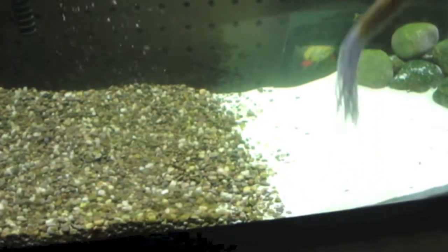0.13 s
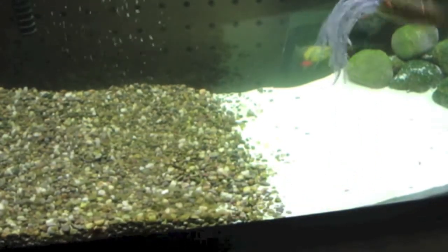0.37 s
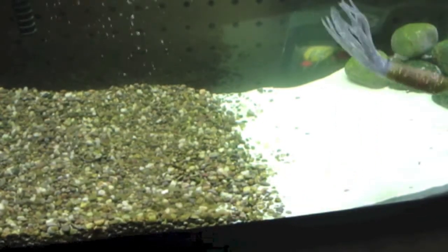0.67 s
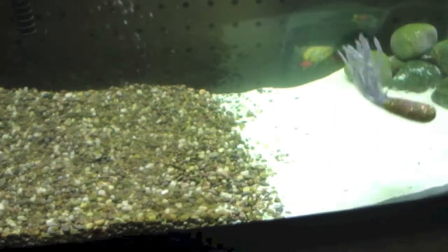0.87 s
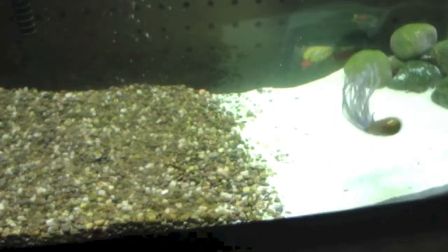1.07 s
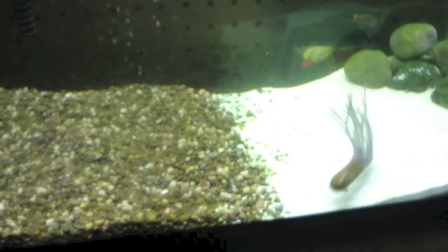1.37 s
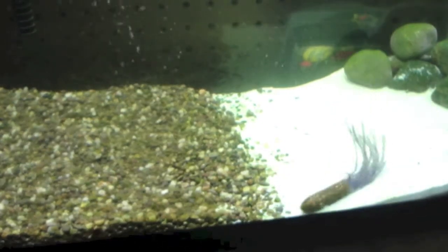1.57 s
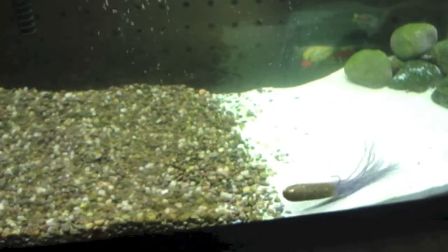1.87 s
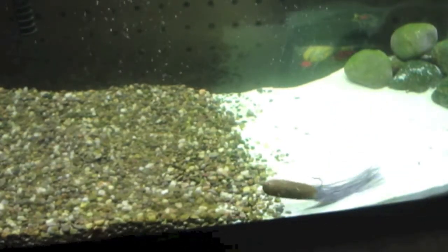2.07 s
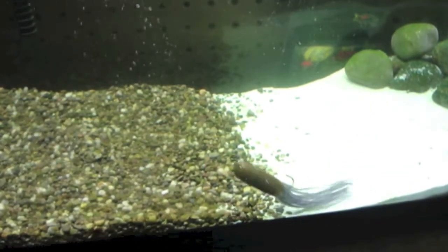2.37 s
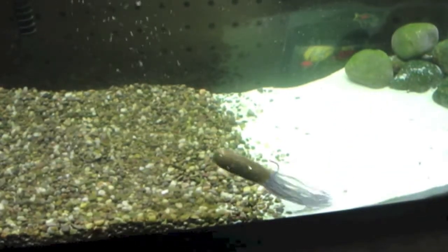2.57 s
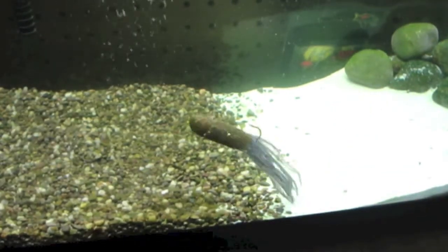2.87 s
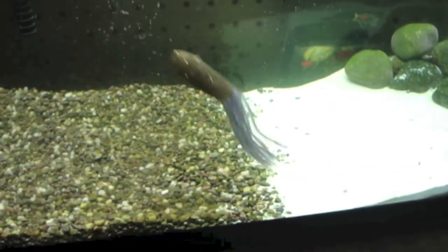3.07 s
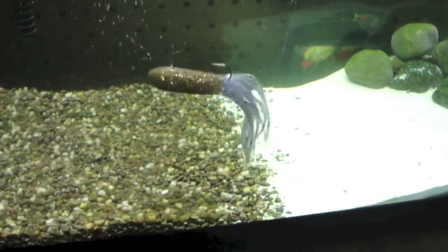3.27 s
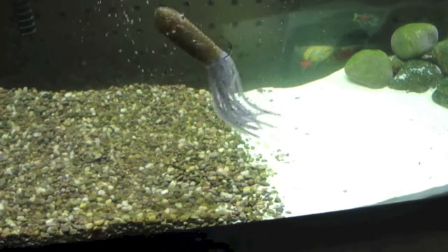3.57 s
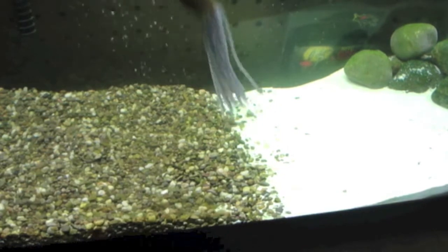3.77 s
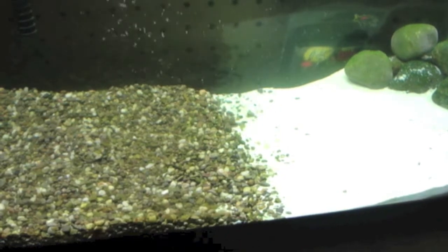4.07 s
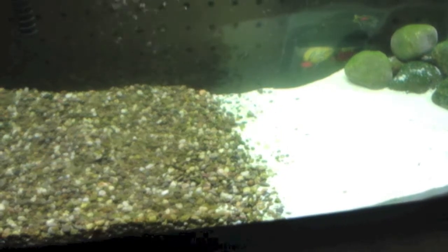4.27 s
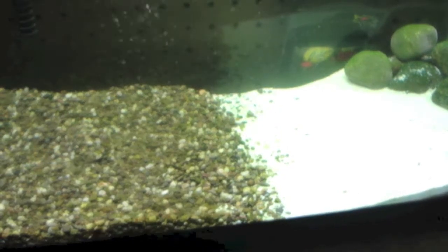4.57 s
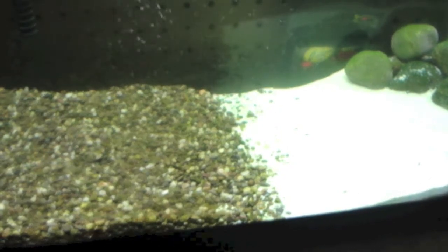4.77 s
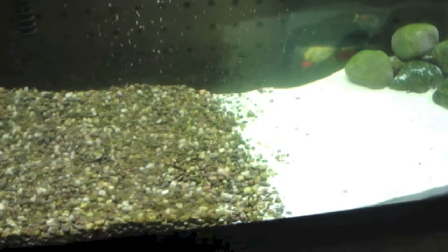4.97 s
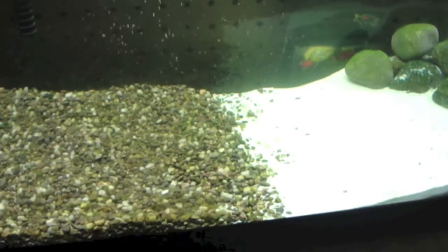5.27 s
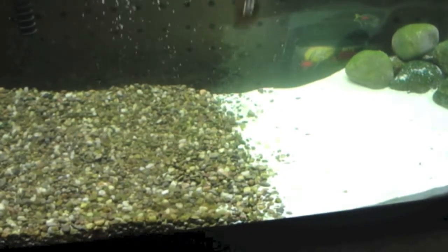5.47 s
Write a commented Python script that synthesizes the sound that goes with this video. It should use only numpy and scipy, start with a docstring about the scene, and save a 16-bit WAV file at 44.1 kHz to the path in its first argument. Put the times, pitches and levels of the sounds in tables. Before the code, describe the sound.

Bubbles pop in a quick, irregular patter of bright drips over soft hiss and faint pump hum, with a sharp tap near the end.

```python
"""Bubbles popping in a covered aquarium

Air bubbles pop at the surface, close by: each is a brief decaying sine smeared by random echoes
between water, glass and lid, with filtered noise for slosh and film snap. Spray ticks as band-passed
noise puffs, a soft lure knocks the tank into ringing modes, and a mains pump hums as wavering
harmonics in shaped room noise."""
import sys
import numpy as np
from scipy import signal
from scipy.fft import rfft, irfft
from scipy.io import wavfile
from scipy.ndimage import uniform_filter1d

SR = 44100
rng = np.random.default_rng(int(sys.argv[2]) if len(sys.argv) > 2 else 0)


def wrap_up_sound(samples):
    """Save the sound to the file named by the first command line argument, as 16-bit audio."""
    columns = np.atleast_2d(samples).T
    # keep every value between -1 and 1, then stretch to whole-number steps
    tamed = np.clip(columns, -1, 1)
    steps = np.round(tamed * 32767).astype(np.int16)
    wavfile.write(sys.argv[1], SR, steps)


N = 248724  # samples
GRAIN = 2048  # samples in one bubble or puff


def undb(db):
    """Decibels to amplitude factor."""
    return 10 ** (np.asarray(db) / 20)


def add(out, start_s, grain):
    """Mix a grain in at start_s, cut at the end of out."""
    i = int(start_s * SR)
    out[i:i + len(grain)] += grain[:max(len(out) - i, 0)]


def band(x, lo_hz, hi_hz):
    """Butterworth band-pass."""
    sos = signal.butter(2, [lo_hz, hi_hz], "bandpass", fs=SR, output="sos")
    return signal.sosfilt(sos, x)


def walk(rate_hz):
    """Slow random wander, standard deviation 1: random steps smoothed twice."""
    step = int(SR / rate_hz)
    steps = np.repeat(rng.standard_normal(N // step + 1), step)
    wander = uniform_filter1d(uniform_filter1d(steps, step), step)[:N]
    return wander / wander.std()


def unit_noise(spectrum):
    """Back to time from a shaped noise spectrum, RMS scaled to 1."""
    noise = irfft(spectrum)
    return noise / noise.std()


# room and water noise spectrum, relative: freq_hz [Hz], density_db [dB per Hz]
AIR_SPECTRUM = [(15, -50), (25, -18), (64, -10.5), (170, 2), (290, 5.5), (405, 4.5), (674, 6), (1650, 0),
                (2550, -2.5), (4030, -3.5), (9000, -8), (11200, -15), (22000, -54)]
AIR_DB = -52


def air():
    """Room and water noise: white noise through a fixed spectrum, gently unsteady in level."""
    freq_hz, density_db = np.transpose(AIR_SPECTRUM)
    f_hz = np.arange(N // 2 + 1) * SR / N + 1e-3
    shape = undb(np.interp(np.log(f_hz), np.log(freq_hz), density_db))
    noise = unit_noise(rfft(rng.standard_normal(N)) * shape)
    return undb(AIR_DB + 0.15 * walk(27.2)) * noise


# mains hum harmonics: freq_hz [Hz], level_db [dB RMS, before wavering]
PUMP_HARMONICS = [(60, -103), (120, -74), (180, -70), (240, -96), (300, -67.5), (360, -70)]


def pump():
    """Mains pump: harmonics at random phase, each wavering in level."""
    t = np.arange(N) / SR
    hum = np.zeros(N)
    for freq_hz, level_db in PUMP_HARMONICS:
        level = np.sqrt(2) * undb(level_db + 0.96 * walk(6.1))
        hum += level * np.sin(2 * np.pi * (freq_hz * t + rng.random()))
    return hum


# tank modes: freq_hz [Hz], mode_db [dB, relative], t60_s [s]
TANK_MODES = [(215, -6.5, 0.16), (244, -12, 0.24), (364, -6.5, 0.12), (423, -7, 0.097),
              (469.6, 15.5, 0.085), (726, -11.5, 0.15), (890, -4, 0.03), (1120, -20, 0.02),
              (1634, 8, 0.033), (2030, 12.5, 0.028), (3500, 7, 0.043), (4800, -17, .03), (7200, -14, .025)]
# lure knocks: start_s [s], peak_db [dB, ring before rattle], contact_ms [ms],
# spot_hz [Hz, pitch favoured by the spot], reach_oct [octaves]
KNOCK_EVENTS = [(4.925, -40, 0.46, 252, 0.6), (4.929, -28.5, 0.27, 905, 0.46),
                (5.408, -36, 0.16, 3000, 2.5), (4.962, -38, 0.84, 900, 0.26), (5.411, -14.5, 0.28, 600, 3),
                (5.436, -23, 0.66, 866, 0.26)]


def knocks(rattle_db=-20, rattle_t60_s=0.22):
    """A sine-squared push rings the tank; longer contact is duller, the spot favours nearby modes."""
    out, t = np.zeros(N), np.arange(3 * GRAIN) / SR
    for start_s, peak_db, contact_ms, spot_hz, reach_oct in KNOCK_EVENTS:
        ring = np.zeros(len(t))
        for k, (freq_hz, mode_db, t60_s) in enumerate(TANK_MODES):
            spot_db = -11.6 * (np.log2(freq_hz / spot_hz) / reach_oct) ** 2
            level = undb(mode_db + spot_db - 60 * t / t60_s)
            ring += (-1) ** k * level * np.sin(2 * np.pi * freq_hz * t)
        push = np.sin(np.pi * np.clip(t[:100] * 1000 / contact_ms, 0, 1)) ** 2
        knock = signal.fftconvolve(ring, push)[:len(t)]
        # lid and fittings shake roughly after the blow
        rattle = band(rng.standard_normal(len(t)), spot_hz / 7.0, spot_hz * 1.7)
        rattle_env = np.minimum(t / 0.004, 1) * undb(rattle_db - 60 * t / rattle_t60_s)
        rattle = rattle / rattle.std() * rattle_env
        add(out, start_s, undb(peak_db) * (knock / np.abs(knock).max() + rattle))
    return out


# film bursts throwing spray: start_s [s], level_db [dB, puff RMS before band-pass and scatter],
# middle_db [dB, 2-6.2 kHz against the top]
SPRAY_BURSTS = [(0.1516, -43.5, -17), (0.184, -41, 0), (0.2014, -42.5, -19), (0.4833, -47, -18),
                (0.6544, -37.5, -7), (0.8679, -59, -6), (1.0041, -45.5, 2), (1.2534, -36.5, -8),
                (1.3043, -46, 8), (1.3555, -38.5, -4), (1.5299, -48, -13), (1.5716, -47.5, 7),
                (1.684, -47.5, 9.5), (1.9926, -50, 11), (2.0759, -40.5, 8), (2.189, -50.5, 13),
                (2.4522, -42, 5.5), (2.6963, -49.5, 8), (2.725, -45.5, 4), (2.745, -42.5, -3),
                (2.9921, -43, 2), (3.2092, -41.5, -15), (3.2973, -46.5, 0), (3.6536, -43, -1.5),
                (3.677, -44.5, -4), (3.7417, -45, 6.5), (3.8408, -41.5, 4), (3.9794, -51.5, 12),
                (4.44, -45.5, 4), (4.796, -46, -17), (4.9028, -37.5, -9), (5.1186, -46.5, 10),
                (5.4085, -32.5, 4.5), (5.5657, -41.5, 2.5)]
FIZZ_PER_S, FIZZ_DB, FIZZ_SPREAD_DB = 45, -60, 3.5  # faint random puffs


def bursts(t60_s=0.045, swell_ms=2.5, ragged_db=4.0):
    """Spray: crackling noise puffs, uneven from band to band; many faint ones come at random."""
    puffs = list(SPRAY_BURSTS)
    for when, size, tilt in rng.random((int(FIZZ_PER_S * N / SR), 3)):
        level_db = FIZZ_DB - FIZZ_SPREAD_DB * np.log(1 - 0.9 * size)
        puffs.append((when * N / SR, level_db, 12 * (tilt - 0.7)))
    out, t = np.zeros(N), np.arange(GRAIN) / SR
    fade = np.minimum(t * 1000 / swell_ms, 1) * undb(-60 * t / t60_s)
    bands = [(2000, 3800, 1), (3800, 6200, 1), (6200, 8300, 0), (8300, 11000, 0)]  # lo_hz, hi_hz, is_middle
    for lo_hz, hi_hz, is_middle in bands:
        drops = np.zeros(N)
        for start_s, level_db, middle_db in puffs:
            noise = rng.standard_normal(GRAIN)
            ragged = np.repeat(rng.standard_normal(GRAIN // 64), 64)
            puff = fade * noise * undb(ragged_db * ragged)
            uneven_db = 2 * rng.standard_normal()
            level = undb(level_db + is_middle * middle_db + uneven_db)
            add(drops, start_s, level * puff / puff[:GRAIN // 4].std())
        out += band(drops, lo_hz, hi_hz)
    return out


def bubble(hz, db, flutter_ms, cycles=5.75, glide=0.011, click_db=-20, snap_ms=13.0, echo_db=-0.5,
           swell_ms=2.42, slosh_db=-13.0, slosh_ms=31.7):
    """A few cycles sliding slightly up in pitch, smeared by close reflections, with slosh and snap."""
    t = np.arange(GRAIN) / SR
    turns = hz * t
    swell = np.minimum(t * 1000 / swell_ms, 1)
    rise = 1 - np.exp(-(turns / 2.5) ** 0.95)
    decay = np.exp(-turns / cycles * 1.34)
    bend = 1 - glide / 2 + glide * np.minimum(turns / cycles, 1.5) / 2
    ping = rise * decay * np.sin(2 * np.pi * turns * bend)

    # sparse reflections, 1500 per s: build up while falling 11 dB per flutter_ms
    arrives = rng.random(GRAIN) < 1500 / SR
    paths = arrives * rng.standard_normal(GRAIN) * swell * undb(-11 * t * 1000 / flutter_ms)
    echoes = irfft(rfft(ping, 2 * GRAIN) * rfft(paths, 2 * GRAIN))[:GRAIN]

    # collapsing crater: noise centred just above the pitch
    noise = rng.standard_normal(GRAIN)
    octaves = np.log2((np.arange(GRAIN // 2 + 1) + 1) * SR / GRAIN / (1.176 * hz))
    slosh = unit_noise(rfft(noise) * np.exp(-(octaves / 0.65) ** 2))
    slosh = slosh * swell * undb(slosh_db - 20 * t * 1000 / slosh_ms)

    # the film snaps: a short broad crack
    snap = unit_noise(rfft(noise[::-1]) * np.exp(-(octaves / 3.5) ** 2))
    snap = snap * swell * undb(click_db - 20 * t * 1000 / snap_ms)

    echoes = undb(echo_db) * echoes / np.abs(echoes).max()
    sound = ping / np.abs(ping).max() + echoes + slosh + snap
    return undb(db) * sound / np.abs(sound).max()


TRAIL_LOWEST_HZ, TRAIL_SPREAD_OCT = 1709, 1.064  # largest trailing bubble; smaller ones sing higher


def trail(count, mean_lag_s, floor_db, spread_db, flutter_ms):
    """Bubbles of random pitch set free in the wake of the louder ones, at exponential lags."""
    out = np.zeros(N)
    for _ in range(count):
        leader_s = POP_EVENTS[rng.integers(len(POP_EVENTS))][0]
        lag_s = mean_lag_s * rng.exponential()
        pitch_hz = TRAIL_LOWEST_HZ * 2 ** (TRAIL_SPREAD_OCT * abs(rng.standard_normal()))
        pitch_hz = np.clip(pitch_hz, 700, 10500)
        peak_db = floor_db + spread_db * min(rng.exponential(), 2.5)
        add(out, leader_s + lag_s, bubble(pitch_hz, peak_db, flutter_ms))
    return out


def patter():
    """Middling bubbles pop soon after the louder ones; many fainter ones trail later."""
    siblings = trail(220, mean_lag_s=0.067, floor_db=-47.5, spread_db=2.5, flutter_ms=4.2)
    faint = trail(700, mean_lag_s=0.11, floor_db=-57, spread_db=3, flutter_ms=15.6)
    return siblings + faint


# louder bubbles: start_s [s], pitch_hz [Hz], peak_db [dB, before lid and room], flutter_ms [ms]
POP_EVENTS = [(0.002, 1780, -41.5, 14), (0.022, 3180, -37, 5), (0.035, 1800, -42, 12),
              (0.028, 2750, -27, 1.5), (0.063, 1790, -39, 5.4), (0.105, 3850, -40.5, 7),
              (0.133, 4960, -39.5, 5.2), (0.135, 2260, -38.5, 6.3), (0.145, 1940, -42.5, 4.8),
              (0.185, 2890, -26.5, 4), (0.189, 2800, -34, 6.2), (0.225, 1990, -43, 6),
              (0.277, 4000, -45, 14), (0.291, 4020, -41, 7.9), (0.301, 2040, -41, 4.2),
              (0.322, 5950, -40, 3.4), (0.421, 5200, -38, 5.3), (0.423, 2090, -28.5, 1.7),
              (0.46, 2600, -36.5, 4.2), (0.482, 5930, -36.5, 4.1), (0.495, 2780, -39.5, 5),
              (0.494, 2220, -38.5, 3.9), (0.484, 2990, -41, 8), (0.53, 3000, -42, 8),
              (0.551, 1980, -32.5, 5.2), (0.579, 2450, -35, 6), (0.585, 1980, -40.5, 7.3),
              (0.612, 5000, -40.5, 7), (0.656, 3360, -32.5, 11), (0.657, 4200, -34.5, 4.2),
              (0.674, 2230, -30.5, 16), (0.693, 5350, -33, 15), (0.694, 2020, -27, 3.9),
              (0.698, 2900, -29, 7), (0.714, 4900, -39, 8), (0.869, 8850, -39.5, 5.1),
              (0.874, 4200, -39.5, 3.4), (0.907, 2190, -43.5, 4.6), (1.005, 3950, -44, 8.1),
              (1.011, 2010, -36, 5.5), (1.031, 3500, -38, 6.3), (1.133, 2040, -41.5, 23),
              (1.147, 3300, -40, 7), (1.162, 4120, -42.5, 9.6), (1.179, 2210, -45, 6),
              (1.254, 3100, -46.5, 7.4), (1.256, 1880, -47, 7), (1.305, 2580, -33, 7.1),
              (1.306, 3020, -34.5, 10), (1.343, 1900, -41, 3.1), (1.363, 2090, -34.5, 8.3),
              (1.374, 5950, -29.5, 12), (1.387, 1420, -32, 9.3), (1.407, 7200, -39, 9),
              (1.388, 3080, -44, 8), (1.42, 4300, -40, 5), (1.422, 3520, -48, 8), (1.467, 1340, -39.5, 5.1),
              (1.467, 4400, -38.5, 3.8), (1.489, 3110, -35.5, 8.1), (1.507, 2720, -39, 12.4),
              (1.508, 5150, -36, 3.3), (1.51, 1145, -44, 18), (1.523, 1904, -36.5, 5),
              (1.572, 2620, -31, 2.9), (1.613, 1700, -42, 3.5), (1.646, 5060, -32.5, 3.1),
              (1.686, 4300, -33, 10.5), (1.744, 2620, -32.5, 4.3), (1.787, 1700, -39.5, 20),
              (1.787, 4200, -35, 2), (1.84, 2620, -36.5, 9.7), (1.864, 5200, -36.5, 3.5),
              (1.964, 6300, -39, 7.1), (1.991, 5160, -30, 10), (2.016, 3950, -30.5, 3),
              (2.079, 2950, -37, 4.4), (2.08, 8300, -34.5, 7.6), (2.102, 4900, -37.5, 14),
              (2.15, 4320, -33.5, 13), (2.193, 2750, -27.5, 4.3), (2.245, 1880, -35.5, 4.8),
              (2.246, 2950, -38, 6.8), (2.263, 2500, -37.5, 11), (2.277, 3410, -39.5, 19),
              (2.298, 5800, -36.5, 13), (2.32, 2200, -37.5, 14), (2.323, 4050, -37, 9.2),
              (2.438, 1910, -34.5, 15), (2.455, 1766, -31.5, 2.5), (2.521, 4770, -33, 3.4),
              (2.54, 3190, -37.5, 4.9), (2.597, 6080, -33.5, 7.5), (2.655, 3370, -32, 10),
              (2.688, 3240, -39.5, 10), (2.7, 2150, -36, 5.1), (2.724, 6130, -36, 17),
              (2.729, 1360, -40, 11), (2.749, 4170, -34, 5.2), (2.814, 2000, -47, 5),
              (2.828, 3350, -39, 5.1), (2.848, 5400, -38, 16), (2.884, 3250, -40, 8.8),
              (2.921, 2960, -39, 5.8), (2.922, 2250, -41, 3.4), (2.924, 3900, -32.5, 6.5),
              (2.954, 2100, -37, 2.6), (2.96, 4920, -25, 5.2), (2.993, 5100, -36, 7.1),
              (2.994, 3250, -35.5, 15), (2.998, 8440, -34.5, 18), (3.008, 1860, -43, 8),
              (3.013, 865, -48.5, 4.6), (3.04, 4450, -33.5, 11), (3.062, 2810, -34.5, 11),
              (3.063, 8300, -35.5, 9.7), (3.064, 1225, -44.5, 6.1), (3.07, 4500, -37, 18),
              (3.114, 2930, -38.5, 10), (3.115, 5230, -36, 9), (3.115, 1765, -29, 4.4),
              (3.117, 1270, -39, 8), (3.136, 1750, -46, 5), (3.154, 3250, -32, 5.5),
              (3.154, 1320, -30, 6.9), (3.155, 1870, -39, 6.1), (3.212, 2120, -57, 7.4),
              (3.242, 1880, -48, 8), (3.275, 1900, -46, 4), (3.308, 2150, -50, 4.6), (3.309, 2810, -41, 10),
              (3.355, 1800, -48, 6.6), (3.372, 6200, -37.5, 9.3), (3.397, 3650, -36.5, 11),
              (3.398, 2820, -38, 9.4), (3.423, 1790, -37, 3.6), (3.464, 2970, -28.5, 5.1),
              (3.466, 3240, -24, 3.4), (3.498, 3240, -38, 15), (3.52, 2810, -37.5, 5.3),
              (3.544, 3040, -39.5, 7.2), (3.6, 1800, -41, 7), (3.63, 1950, -28.5, 2.4),
              (3.655, 2050, -29, 4.5), (3.685, 4600, -40.5, 9), (3.697, 2040, -33, 9.1),
              (3.738, 4200, -33, 2.3), (3.743, 2860, -35, 5), (3.745, 1480, -32, 19),
              (3.76, 1393, -32, 5.5), (3.761, 2760, -34.5, 20), (3.796, 5160, -32.5, 3.1),
              (3.8, 2850, -40, 12), (3.821, 3050, -42, 10), (3.839, 6220, -32, 3.5),
              (3.847, 2930, -26.5, 3.2), (3.847, 3800, -29, 6), (3.848, 3350, -31, 6),
              (3.864, 3880, -28.5, 6.1), (3.863, 5000, -39, 6), (3.864, 1730, -30, 6.5),
              (3.906, 2970, -36.5, 9), (3.92, 1880, -41, 12), (3.97, 5200, -43, 5),
              (3.981, 2020, -40.5, 14), (3.982, 5250, -38.5, 4.5), (4.013, 2210, -38.5, 5.2),
              (4.026, 3170, -37.5, 6.5), (4.057, 2780, -39, 4.5), (4.093, 2190, -38, 7.9),
              (4.251, 1792, -31.5, 5.8), (4.253, 4270, -41.5, 11), (4.319, 2720, -40, 7),
              (4.377, 3050, -47, 5), (4.391, 2280, -25.5, 3.3), (4.4, 823, -40, 5), (4.418, 1775, -43, 7.4),
              (4.419, 2420, -45, 8), (4.44, 1235, -39.5, 13), (4.442, 5330, -35.5, 6.1),
              (4.441, 2584, -27.5, 9), (4.465, 1860, -36.5, 9.1), (4.478, 8600, -34, 3.5),
              (4.491, 2760, -38, 6), (4.493, 1980, -34, 3), (4.507, 2950, -40, 3.9),
              (4.532, 2600, -34, 5.1), (4.559, 4470, -37.5, 5.8), (4.562, 2200, -38.5, 6),
              (4.593, 2210, -32, 4.6), (4.624, 1970, -48, 6), (4.634, 2220, -35.5, 7),
              (4.646, 2480, -35.5, 5.9), (4.658, 3900, -42, 5.8), (4.675, 1980, -28.5, 4.3),
              (4.681, 3000, -40, 8), (4.693, 2190, -34, 3.1), (4.732, 4260, -40, 4.8),
              (4.735, 1760, -44, 12), (4.818, 5500, -40, 4.8), (4.82, 2120, -34.5, 6.6),
              (4.819, 3000, -34.5, 3.2), (4.845, 1770, -39, 7.2), (4.85, 2740, -41, 8.5),
              (4.909, 5340, -35, 5.8), (4.906, 3740, -35.5, 13), (4.915, 1880, -39, 8.9),
              (4.937, 1820, -33.5, 4.1), (4.937, 4970, -31.5, 9.6), (4.938, 2950, -34, 3.3),
              (4.985, 2830, -39, 2.4), (4.984, 1480, -36, 12), (5.008, 2740, -33.5, 7.1),
              (5.009, 3200, -43, 6), (5.021, 1850, -48, 8), (5.121, 2570, -36, 4.6),
              (5.123, 1580, -26, 3.5), (5.236, 1900, -40, 5), (5.248, 1860, -23, 2.1),
              (5.247, 2860, -33, 4.9), (5.277, 4200, -38, 6.7), (5.298, 6200, -38.5, 4.4),
              (5.353, 6000, -39.5, 16), (5.372, 3190, -34, 13), (5.459, 2700, -35.5, 6.1),
              (5.478, 1910, -45, 5), (5.503, 2550, -43, 8), (5.57, 3080, -41.5, 5.3),
              (5.605, 1224, -25, 7.2), (5.606, 5960, -38, 6), (5.616, 4150, -36.5, 7.7),
              (5.63, 3570, -37, 6.7)]


def pops():
    """The louder bubbles, each a ping with its own flutter of reflections."""
    out = np.zeros(N)
    for start_s, pitch_hz, peak_db, flutter_ms in POP_EVENTS:
        add(out, start_s, bubble(pitch_hz, peak_db, flutter_ms))
    return out


# pitches favoured by the air under the lid: centre_hz [Hz], width_hz [Hz], gain_db [dB]
LID_BANDS = [(1470, 70, -7), (1868, 110, -3), (2130, 70, -5), (2392, 60, -9), (2714, 110, -3),
             (3090, 150, -4), (3640, 90, -9), (3865, 55, -6)]


def under_lid(x):
    """Air under the lid rings along: band-passed copies added at its favoured pitches."""
    ringing = np.zeros(N)
    for centre_hz, width_hz, gain_db in LID_BANDS:
        ringing += undb(gain_db) * band(x, centre_hz - width_hz / 2, centre_hz + width_hz / 2)
    return x + ringing


BASS_CUT_HZ = 180
ROOM_T60_S, ROOM_DB = 0.14, -15


def room(near):
    """Short room tail: swelling, decaying noise of set energy convolved with the near sound."""
    t = np.arange(SR // 2) / SR
    tail = rng.standard_normal(len(t)) * undb(-60 * t / ROOM_T60_S) * np.minimum(t / 0.033, 1)
    tail = undb(ROOM_DB) * tail / np.sqrt(np.sum(tail ** 2))
    return signal.fftconvolve(near, tail)[:N]


def scene():
    """All sources; the room answers bubbles, spray and knocks."""
    near = under_lid(pops() + patter()) + bursts() + knocks()
    # small sources radiate little bass
    bass_cut = signal.butter(4, BASS_CUT_HZ, "highpass", fs=SR, output="sos")
    near = signal.sosfilt(bass_cut, near)
    return (near + room(near) + pump() + air())[None]


DULL_HZ, TOP_HZ = 10350, 10980


def record(dry):
    """The sound dulls above about 10 kHz and holds almost nothing above 11 kHz."""
    dulled = signal.sosfilt(signal.butter(6, DULL_HZ, fs=SR, output="sos"), dry)
    return signal.sosfilt(signal.ellip(14, 0.2, 60, TOP_HZ, fs=SR, output="sos"), dulled)


dry = scene()
out = record(dry)
wrap_up_sound(out)
```